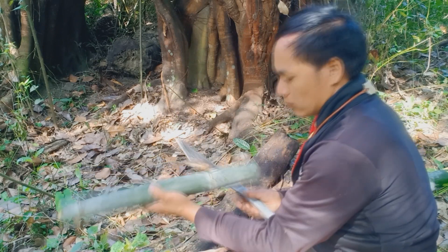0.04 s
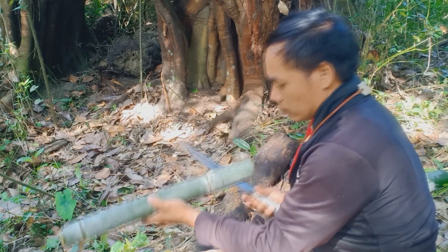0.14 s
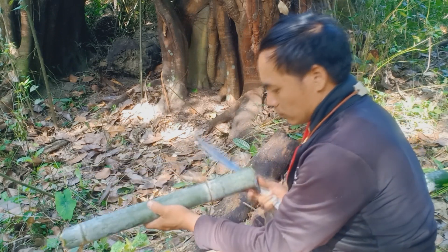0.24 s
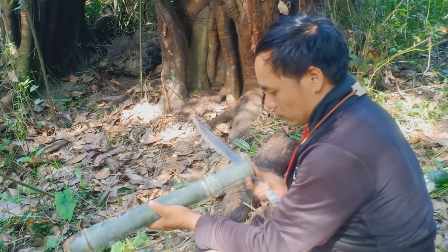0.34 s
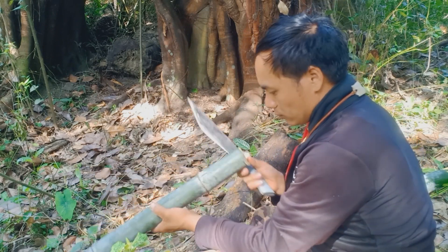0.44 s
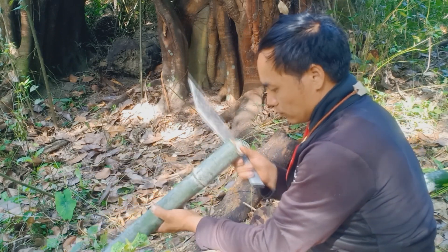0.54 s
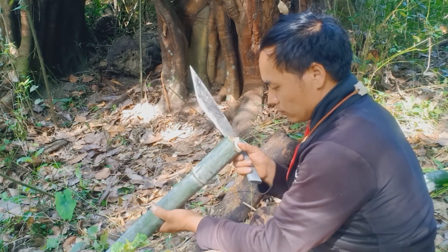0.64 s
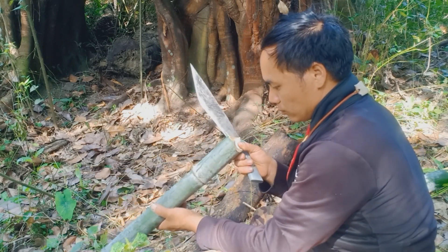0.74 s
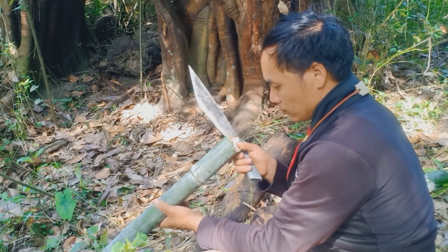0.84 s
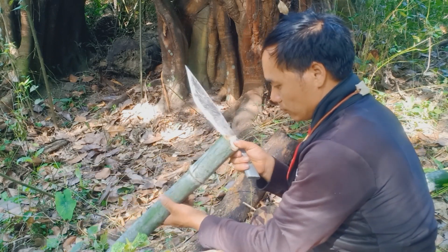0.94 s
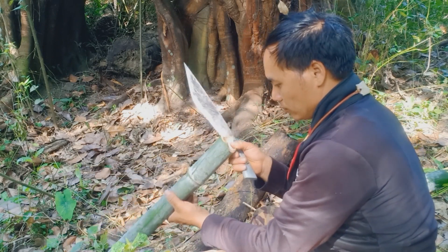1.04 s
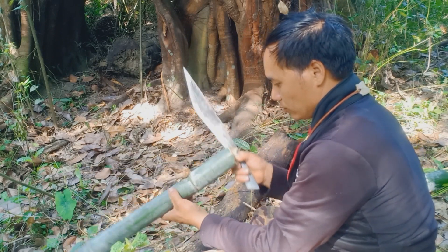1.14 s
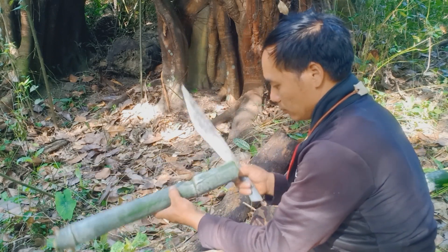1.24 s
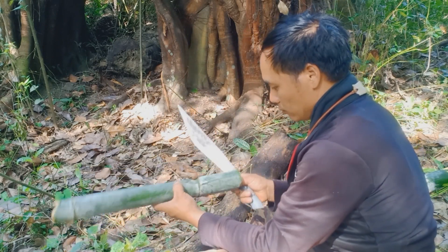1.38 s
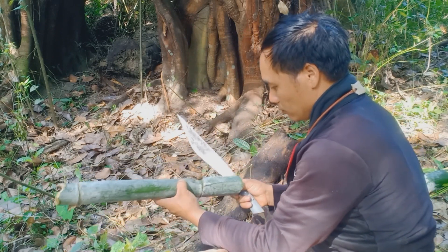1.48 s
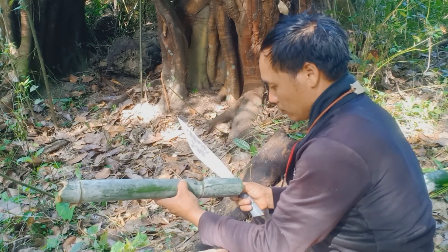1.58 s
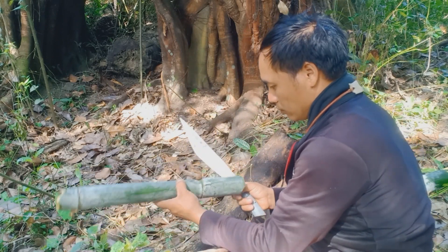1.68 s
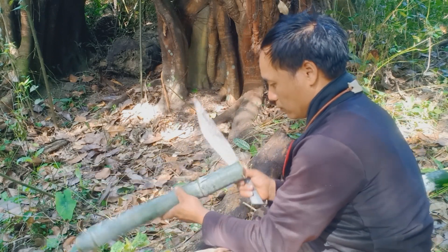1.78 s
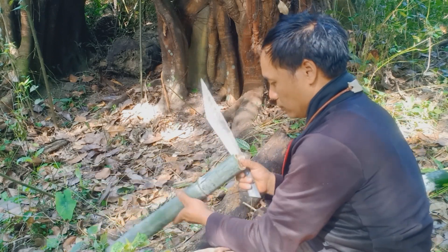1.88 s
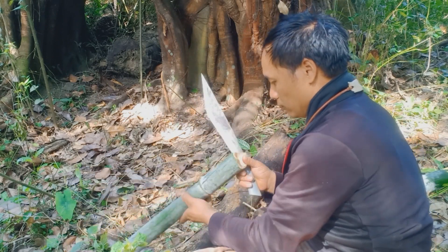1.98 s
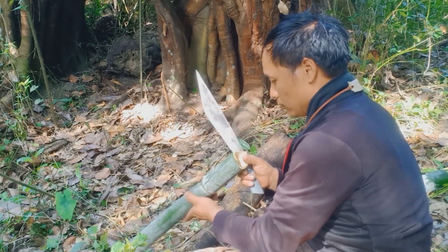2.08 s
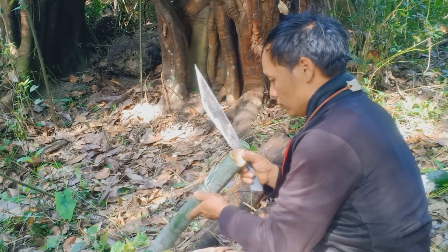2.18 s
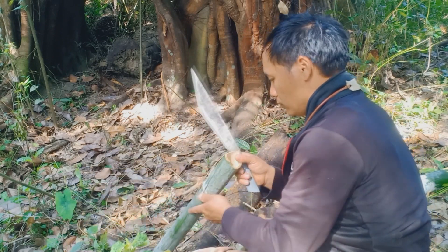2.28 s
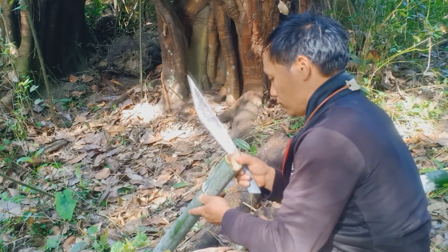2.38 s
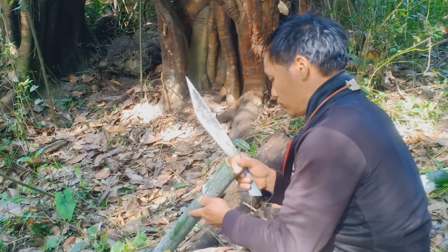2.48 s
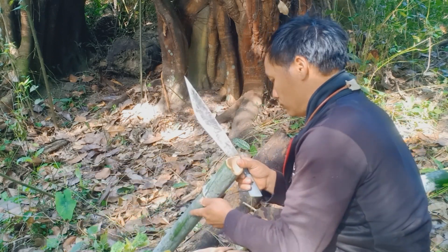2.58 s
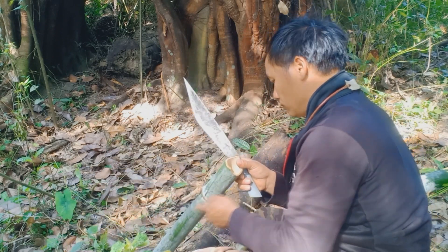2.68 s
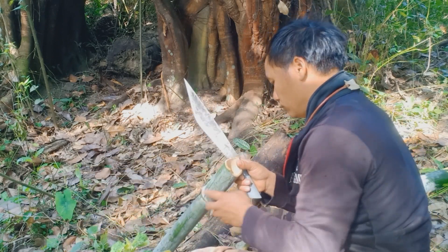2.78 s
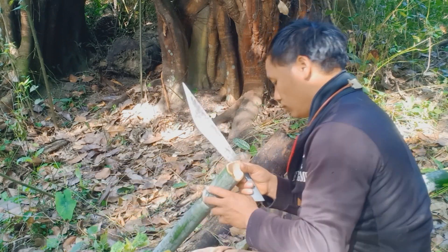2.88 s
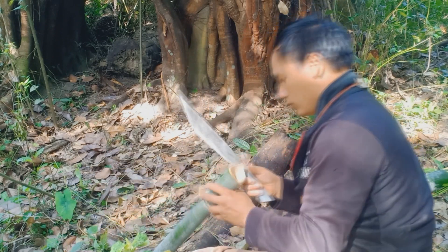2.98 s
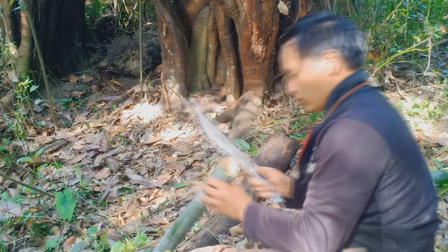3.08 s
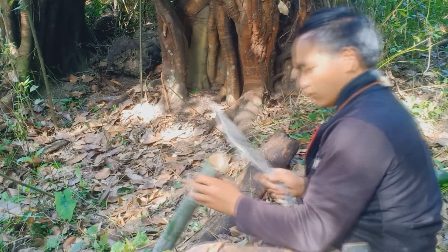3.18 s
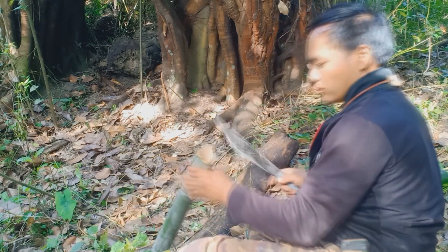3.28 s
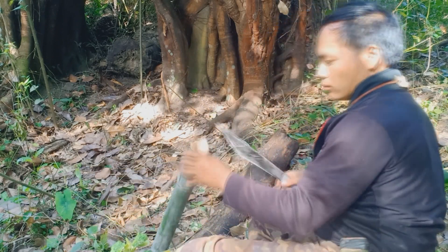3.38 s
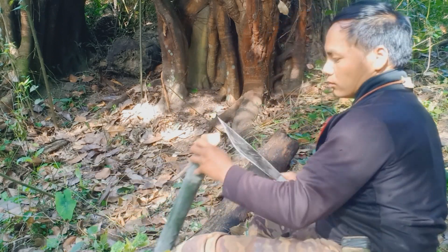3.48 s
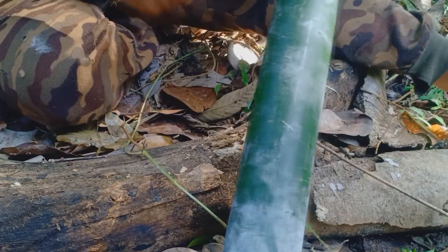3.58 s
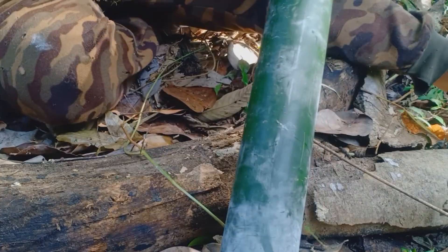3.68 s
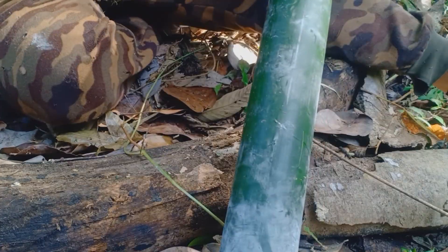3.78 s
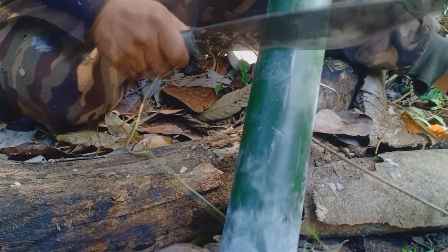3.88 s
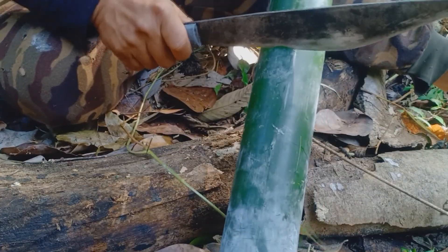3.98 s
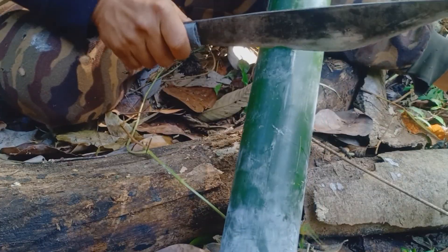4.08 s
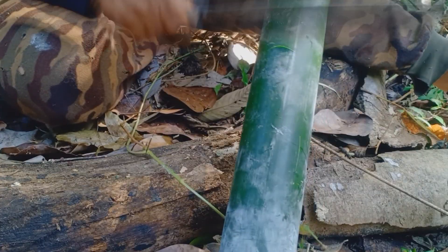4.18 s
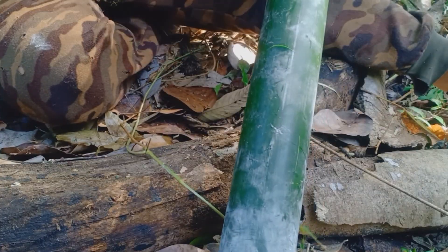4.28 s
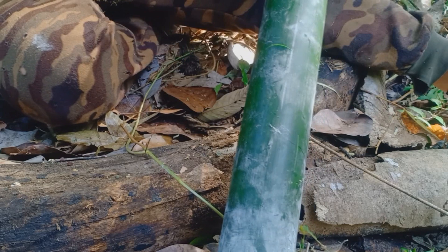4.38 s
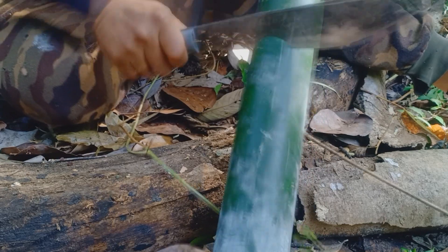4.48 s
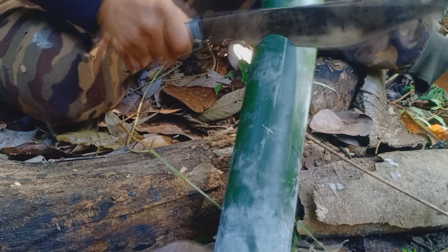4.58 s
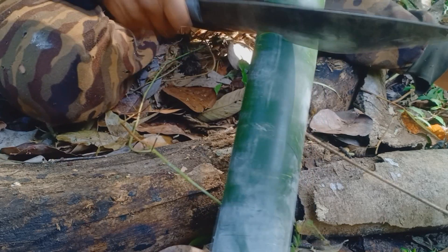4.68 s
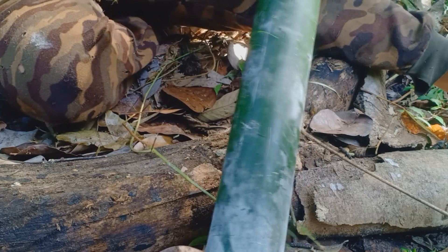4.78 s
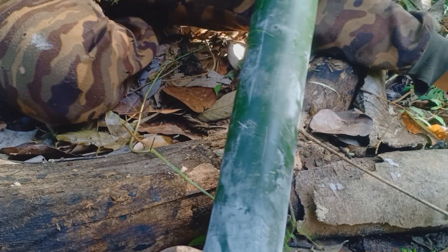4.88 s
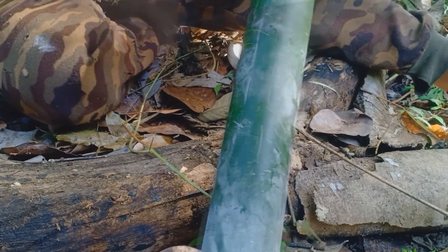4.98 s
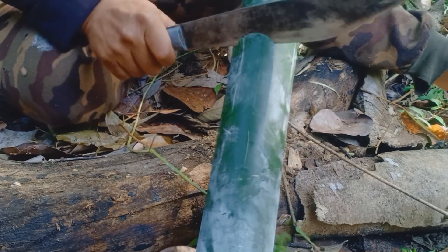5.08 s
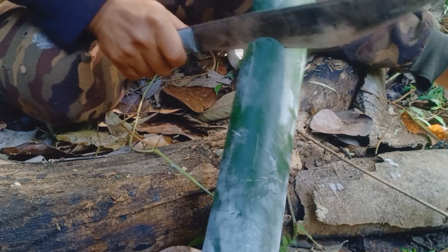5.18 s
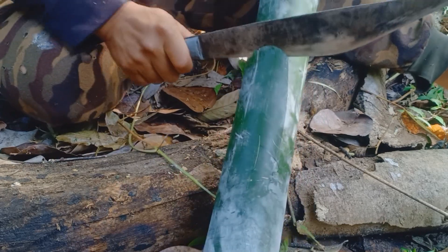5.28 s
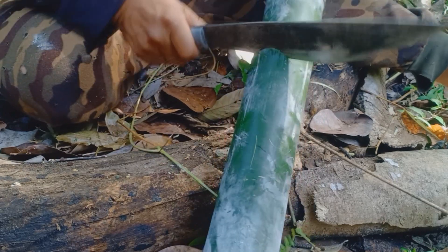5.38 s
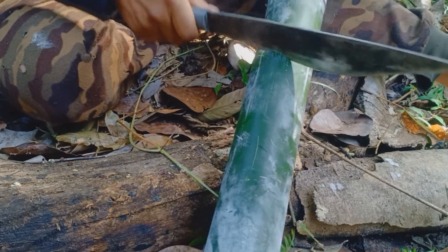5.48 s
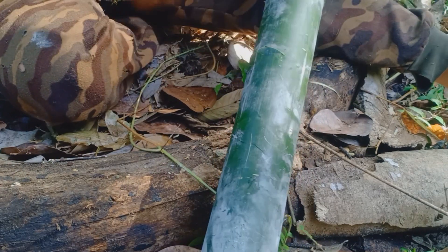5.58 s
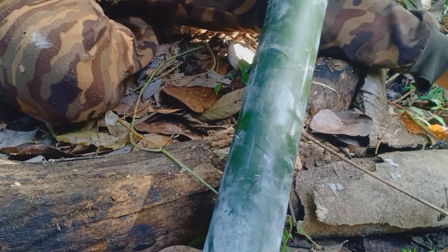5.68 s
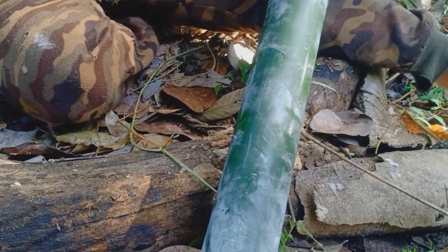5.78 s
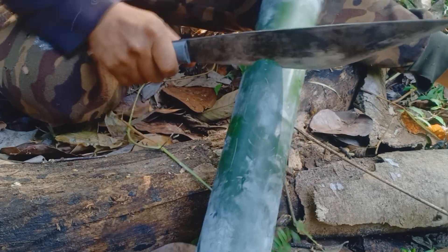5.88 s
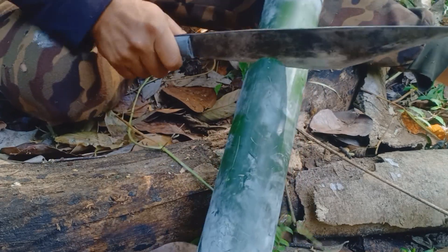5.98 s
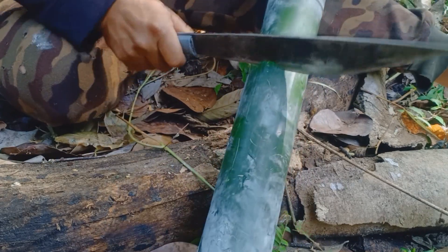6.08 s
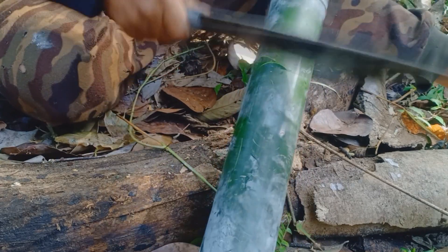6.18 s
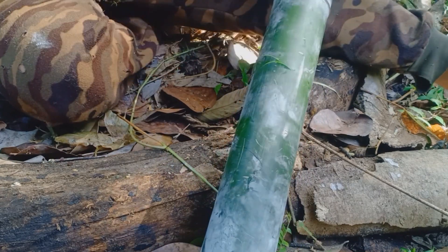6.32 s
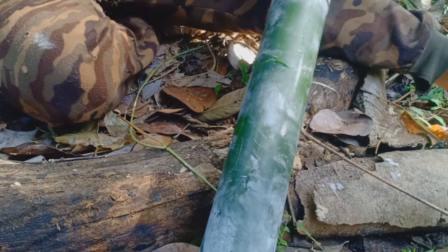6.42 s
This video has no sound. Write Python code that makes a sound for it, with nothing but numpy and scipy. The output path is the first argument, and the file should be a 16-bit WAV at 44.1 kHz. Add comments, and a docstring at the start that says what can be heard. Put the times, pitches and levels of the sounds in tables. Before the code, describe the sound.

Faint forest hush and distant whistling birds with rustling sleeves and leaves and a few small woody taps. After a louder clack, four hard machete chops land on a hollow bamboo pole, roughly half a second to nearly a second apart, each introduced by a bright tick. Gritty scraping and snapping fibres fill the gaps. Close, dry stereo pickup, with the background dipping around the loud blows and only a short leafy outdoor echo.

```python
"""Forest hush lies under it all. At first a green bamboo pole is handled quietly under distant birds, with
rustling sleeves and dry leaves: chirping sine glides and colored noise. Then a machete lands four blows, each
after a sharp tick: noise bursts ring the modes of the wall, and the hollow joint hums on as a slow-dying sine.
The blade scrapes and squeaks free in grainy and resonant noise, and one last tick ends the work.
A small stereo recorder with a look-ahead limiter stands close by."""
import sys
import numpy as np
from scipy import signal
from scipy.fft import rfft, irfft
from scipy.io import wavfile
from scipy.ndimage import uniform_filter1d, minimum_filter1d

SR = 44100
rng = np.random.default_rng(int(sys.argv[2]) if len(sys.argv) > 2 else 0)


def put_to_file(sound):
    """Save the sound as 16-bit audio at rate SR, in the file named by the first command-line argument."""
    columns = np.atleast_2d(sound).T  # one column per channel
    safe = np.clip(columns, -1, 1)
    whole_steps = np.round(safe * 32767)
    wavfile.write(sys.argv[1], SR, whole_steps.astype(np.int16))


def invert_db(level):
    """Linear amplitude ratio for a level in decibels (20 dB per decade), elementwise."""
    return 10 ** (np.asarray(level, dtype=float) / 20)


N = 284445

# stereo image of far sounds: (frequency [Hz], left-right likeness [-1..1], used from 0 up)
FAR_IMAGE = [(60, 0.93), (380, -0.054), (2380, -1), (15000, 0.052)]
# stereo image of near sounds: (frequency [Hz], left-right likeness [0..1])
NEAR_IMAGE = [(60, 0.99), (240, 0.98), (950, 0.86), (3770, 0.35), (15000, 0.17)]


def rms_one(x):
    """Scales a signal to an rms of 1."""
    return x / np.sqrt(np.mean(x ** 2) + 1e-20)


def at_hz(points, hz):
    """Reads a curve of (frequency, value) on a log frequency axis."""
    points = np.array(points)
    return np.interp(np.log(hz + 1), np.log(points[:, 0]), points[:, 1])


def add(out, x, s):
    """Mixes x into out from time s, cut at the end of the scene."""
    i = round(s * SR)
    out[:, i:i + x.shape[-1]] += x[..., :N - i]


def pair(mid, side, likeness, colour=((20, 0), (20000, 0))):
    """Left and right from two sources: the likeness curve sets how much they share at each frequency."""
    hz = np.fft.rfftfreq(len(mid), 1 / SR)
    alike = np.clip(at_hz(likeness, hz), 0, 1)
    shared = np.sqrt(1 + alike) * rfft(mid)
    opposed = np.sqrt(1 - alike) * rfft(side) * [[1], [-1]]
    return irfft((shared + opposed) * invert_db(at_hz(colour, hz)), len(mid))


def ring(x, hz, t60):
    """Two-pole resonance: a unit click sets a sine of about height 1 ringing."""
    r, w = invert_db(-60 / (t60 * SR)), 2 * np.pi * hz / SR
    return signal.lfilter([0, np.sin(w)], [1, -2 * r * np.cos(w), r * r], x)


def decaying(db, hz, t60, rise_s):
    """One mode that swells briefly and dies."""
    t = np.arange(int(t60 * SR)) / SR
    return invert_db(db - 60 * t / t60) * (1 - np.exp(-t / rise_s)) * np.sin(2 * np.pi * hz * t)


def grains(colour, likeness, per_s, spread_db, smooth):
    """Dense uneven clicks in clumps over a smooth bed; rms 1."""
    clumps = np.repeat(rng.standard_normal(N // 256 + 1), 256)[:N]
    clumps_db = 1.3 * uniform_filter1d(clumps, size=300)
    born = rng.random(N) < per_s / SR
    sizes = invert_db(spread_db * rng.exponential(1, N)) * invert_db(clumps_db)
    sizes = np.minimum(sizes, invert_db(14))
    white = rng.standard_normal((2, N)) * (rms_one(born * sizes) + smooth)
    return rms_one(pair(*white, likeness, colour))


def swells(rows):
    """Gain over time: each movement swells to its loudest moment and fades; powers add."""
    t = np.arange(N) / SR
    swell_db = 20  # gained in one swell time, lost in one fade time
    power = 0
    for s, db, swell, fade in rows:
        away = np.maximum((s - t) / swell, (t - s) / fade)
        power = power + invert_db(db - swell_db * away) ** 2
    return np.sqrt(power)


def forest_hush():
    """Steady wide noise shaped to the colour of the forest."""
    # colour of the hush: (frequency [Hz], level [dB per Hz])
    hush_colour = [(12, -29.5), (20, -18.5), (34, -33), (53, -20), (94, -17), (426, -19.5), (533, -17.5),
                   (1390, -26), (2170, -20.5), (3600, -31.5), (4900, -26.5), (7890, -42.5), (9600, -44.5),
                   (13800, -40.5), (16400, -56.5)]
    white = rng.standard_normal((2, N))
    return invert_db(-70) * rms_one(pair(*white, FAR_IMAGE, hush_colour))


def waver():
    """Slow random unsteadiness of a bird's pitch, rms 1."""
    return rms_one(uniform_filter1d(rng.standard_normal(N), size=260))


def whistling_birds():
    """Single whistles and sung phrases: gliding sines with wavering pitch, fluttering through leaves."""
    # single whistles: (time [s], length [s], start pitch [Hz], end pitch [Hz], level [dB])
    single_notes = [(0.204, 0.11, 6700, 5600, -77), (0.283, 0.084, 5600, 5520, -72),
                    (0.338, 0.069, 6000, 7200, -80), (2.06, 0.13, 2150, 2136, -77)]
    # song phrase: (time after the held note starts [s], length [s], start pitch [Hz], end pitch [Hz],
    # level [dB]); both times are stretched below
    phrase_notes = [(-.03, .035, 5400, 4960, -13.5), (0, 0.09, 5060, 4960, 0),
                    (0.061, 0.044, 4100, 4040, -10.5), (0.086, .07, 5700, 5900, -8),
                    (.13, .04, 5050, 4900, -3), (0.165, .08, 4600, 4603, -2.5)]
    # phrases sung: (time [s], level [dB], stretch of time [factor])
    phrase_starts = [(.39, -69.5, 0.77), (1.405, -67.5, 1.03), (3.334, -67, 0.9)]
    notes = list(single_notes)
    for s, db, stretch in phrase_starts:
        for after, length, from_hz, to_hz, note_db in phrase_notes:
            notes.append((s + after * stretch, length * stretch, from_hz, to_hz, db + note_db))
    out, wander = np.zeros((2, N)), waver()
    flutter_db = 3.65 * rms_one(uniform_filter1d(rng.standard_normal(N), size=120))
    flutter = invert_db(flutter_db)  # leaves in the path
    for s, length, from_hz, to_hz, db in notes:
        t = np.arange(int(length * SR)) / SR
        during = slice(round(s * SR), round(s * SR) + len(t))
        glide = from_hz + (to_hz - from_hz) * t / length
        hz = glide * (1 + 0.015 * wander[during])
        arch = np.sin(np.pi * t / length) ** 0.5
        tone = np.sin(2 * np.pi * np.cumsum(hz) / SR)
        add(out, invert_db(db) * arch * tone * flutter[during], s)
    return out


def chipping_bird():
    """Short chips that leap up to their note with a hoarse start."""
    # chips: (time [s], level [dB] ahead of the envelope)
    chip_times = [(0.1984, -60.5), (0.6204, -62.5), (1.0665, -63), (1.8093, -65), (2.1066, -64.5),
                  (2.4828, -61.5), (3.0525, -64)]
    from_hz, to_hz, chip_ms = 3800, 5050, 17.4
    out, wander = np.zeros((2, N)), waver()
    t = np.arange(2048) / SR * 1000 / chip_ms  # in chip lengths
    leap = to_hz - (to_hz - from_hz) * np.exp(-t / 0.1)
    envelope = (1 - np.exp(-t / 0.021)) * np.exp(-t ** 2)
    for s, db in chip_times:
        rasp = 1 + 0.073 * wander[round(s * SR)::8][:len(t)] * np.exp(-t / 0.9)
        add(out, invert_db(db) * envelope * np.sin(2 * np.pi * np.cumsum(leap * rasp) / SR), s)
    return out


def birds():
    """All birds, far off and slightly to the right."""
    return (whistling_birds() + chipping_bird()) * invert_db([[-1.2], [1.2]])


def trunks(x, db, t60):
    """Far returns from trunks: dying noise, own in each ear."""
    t = np.arange(int(t60 * SR)) / SR
    tail = rng.standard_normal((2, len(t))) * invert_db(-60 * t / t60) * (1 - np.exp(-t / 0.0018))
    tail = tail / np.sqrt(np.mean(np.sum(tail ** 2, axis=1)))
    return invert_db(db) * signal.fftconvolve(x, tail, axes=1)[:, :N]


def leaves(x):
    """Moving foliage returns each third-octave band as fresh noise that dies away."""
    # scatter from leaves and trunks: (frequency [Hz], gain [dB])
    scatter_gain = [(350, -24.5), (1000, -26.5), (1800, -25.5), (2500, -20.5), (3400, -25), (4800, -10),
                    (6500, -29.5), (9000, -28.5), (15000, -7.5)]
    # how long the scatter lasts: (frequency [Hz], time to fall 60 dB [s])
    scatter_decay = [(350, 0.17), (2500, 0.35), (15000, 0.29)]
    out, edges = 0, 300 * 2 ** np.arange(0, 5.9, 1 / 3)
    white = rng.standard_normal((2, 2, N))
    mono = x.mean(axis=0) + 1e-12
    for k, (low, high) in enumerate(zip(edges, edges[1:])):
        hz = np.sqrt(low * high)
        band = signal.butter(2, [low, high], "band", fs=SR, output="sos")
        keep = invert_db(-120 / (at_hz(scatter_decay, hz) * SR))  # 120: this decay acts on power
        power = signal.lfilter([0.001], [1, -keep], signal.sosfilt(band, mono) ** 2)
        noise = rms_one(signal.sosfilt(band, white[k % 2]))  # neighbouring bands differ
        out = out + invert_db(at_hz(scatter_gain, hz)) * np.sqrt(power) * noise
    return out


def rustle():
    """Sleeves and dry leaves: very dense grains that swell and fade with each movement."""
    # movements: (loudest time [s], level [dB], swell [s], fade [s])
    movements = [(.15, -78, .12, .1), (.95, -73, 0.13, 0.47), (1.12, -71, 0.35, 0.06),
                 (1.7, -91, 0.36, 0.58), (2.15, -79, 0.11, 0.51), (2.3, -66, 0.49, 0.088),
                 (2.72, -71.5, 0.24, 0.41), (2.96, -67, 0.065, 0.34), (3.4, -71, 0.38, 0.076),
                 (3.6, -71, 0.24, 0.037)]
    # colour of cloth and leaves: (frequency [Hz], level [dB])
    leaf_colour = [(150, -24), (400, -6), (1000, 6), (2300, 12), (5000, 18.5), (7500, 6), (11000, -5),
                   (14000, 7.5), (16000, -17)]
    return swells(movements) * grains(leaf_colour, FAR_IMAGE, per_s=5200, spread_db=4.5, smooth=0.6)


def scrape():
    """Blade and pole rub on fibres and leaves: coarser grains that swell and fade."""
    # rubs: (loudest time [s], level [dB], swell [s], fade [s])
    rubs = [(1.75, -69.5, 0.09, 0.093), (2.95, -64, 0.05, .05), (3.675, -60, 0.0096, 0.11),
            (3.81, -58.5, 0.08, 0.089), (4.12, -64.5, 0.17, 0.16), (4.28, -71.5, 0.018, 0.086),
            (4.725, -51.5, 0.22, 0.042), (4.764, -41.5, 0.071, 0.038), (4.81, -59.5, .05, 0.11),
            (5.245, -59, 0.59, 0.065), (5.37, -49.5, 0.087, 0.16), (5.425, -49, .05, 0.019),
            (5.5, -57.5, .06, 0.15), (5.553, -48, 0.022, 0.1), (5.77, -67, 0.17, .05),
            (5.83, -56, 0.063, 0.18), (6.0, -56.5, 0.054, 0.23), (6.21, -55, 0.35, .025),
            (6.288, -61.5, 0.18, 0.093), (6.41, -67.5, 0.082, 0.091)]
    # colour of the rubbing: (frequency [Hz], level [dB per Hz])
    rub_colour = [(180, -61.5), (300, -11), (412, -16), (565, -7), (762, -2), (915, -7), (1010, -7),
                  (1530, -11), (1930, -3), (2650, -5.5), (3760, -12), (5080, -7), (8790, -31),
                  (13500, -24.5), (16000, -32)]
    return swells(rubs) * grains(rub_colour, NEAR_IMAGE, per_s=740, spread_db=5.5, smooth=1.0)


def squeaks():
    """The blade drags with a hoarse squeak: stick-slip noise through one resonance."""
    # squeaks: (time [s], length [s], pitch [Hz], level [dB])
    drags = [(6.243, 0.095, 2340, -62), (6.26, 0.056, 5050, -59)]
    out = np.zeros((2, N))
    for s, length, hz, db in drags:
        count = int(length * SR)
        rub = pair(*rng.standard_normal((2, 8192)), NEAR_IMAGE)[:, :count]
        arch = np.sin(np.pi * np.arange(count) / count)
        add(out, invert_db(db) * rms_one(ring(rub, hz, t60=0.0124)) * arch, s)
    return out


def contact(db, ms, bass_db, treble_db, after_db, after_ms, cut_hz, rise_ms=0.24):
    """Fibres snap for some ms, splinters crackle on; both ring the wall modes."""
    # wall of the pole, damped by wet fibre: (frequency [Hz], level [dB], time to fall 60 dB [s])
    wall_modes = [(357.4, -15, 0.053), (774, -32.5, 0.022), (915, 1.5, 0.013), (1306, 0.5, 0.0083),
                  (1830, -4, 0.014), (2081, -6, 0.01), (2524, 8, 0.0058), (3050, 2.5, 0.0044),
                  (3860, 8, 0.0025), (4590, 4, 0.0082), (5120, -2.5, 0.0073), (5800, -40, 0.011),
                  (6700, -47, 0.015), (7810, -43.5, 0.0043), (10300, -66, 0.0087), (10600, -10, 0.0024),
                  (14000, -30, .002)]
    # contacts are duller above about 6 kHz: (frequency [Hz], level [dB])
    contact_colour = [(5800, 0), (8000, -6.5), (11000, -5.5), (16000, -3.5)]
    t = np.arange(8192) / SR * 1000
    bite, crackle = np.exp(-(t / ms) ** 2), invert_db(after_db) * np.exp(-t / after_ms)
    force = (1 - np.exp(-t / rise_ms)) * (bite + crackle)
    uneven = rng.standard_normal((2, 8192)) * (5.0 + rng.exponential(1, 8192))
    snaps = pair(*(force * uneven), NEAR_IMAGE, contact_colour)
    tilt, out = [(700, bass_db), (2000, 0), (5000, treble_db)], 0
    chances_db = rng.normal(0, 1.5, len(wall_modes))  # no two contacts ring alike
    for (hz, mode_db, t60), chance_db in zip(wall_modes, chances_db):
        out = out + invert_db(mode_db + at_hz(tilt, hz) + chance_db) * ring(snaps, hz, t60)
    out = signal.sosfilt(signal.butter(3, cut_hz, "high", fs=SR, output="sos"), out)
    loudest = uniform_filter1d(np.mean(out ** 2, axis=0), size=180).max()
    return invert_db(db) * out / np.sqrt(8 * loudest)  # loudest 4 ms: rms 9 dB below db


def handling(hits, hums):
    """Pole and blade knock together; the short piece, the long pole and the ground answer in sines."""
    # knocks: (time [s], level [dB], bass tilt [dB], treble tilt [dB])
    knocks = [(0.143, -54.5, -12, 5), (0.156, -58, -10, 12), (1.261, -42.5, -21, -18), (1.649, -55, 7, -9),
              (1.909, -53.5, -6, -18), (2.301, -44, -24, 2), (2.927, -55, -18, -23), (2.969, -51, -21, 1),
              (3.644, -45, -28, -7), (3.668, -36, -22, -11), (4.179, -51.5, -4, -19),
              (4.726, -33.5, -24, -7), (4.745, -32.5, -33, -25.5), (4.758, -29.5, -23, 25),
              (4.908, -50.5, 8, -28), (5.31, -47, 12, -30), (5.363, -40.5, -36, -10),
              (5.427, -40.5, -7, 1.5), (5.492, -43, -24, -34), (5.551, -38.5, -32, -14.5),
              (5.566, -41, 2, -13), (5.76, -45, -3, 0), (6.116, -44, 3, -17), (6.206, -42.5, -31, -10.5)]
    # the short piece hums when knocked: (time [s], level [dB])
    short_hums = [(1.272, -57), (1.652, -64), (1.91, -70.5), (2.935, -65)]
    # the long pole answers some knocks with a brief hollow note: (time [s], level [dB])
    pole_notes = [(3.668, -44), (3.792, -55), (4.18, -56), (5.427, -50), (6.118, -60)]
    # pole end meets the ground: (time [s], level [dB])
    set_downs = [(2.303, -48.5)]
    for s, db, bass_db, treble_db in knocks:
        add(hits, contact(db, 3.5, bass_db, treble_db, after_db=-3, after_ms=16.5, cut_hz=240), s)
    for s, db in short_hums:
        add(hums, decaying(db, hz=589.5, t60=0.21, rise_s=0.00087), s)
    for s, db in pole_notes:
        add(hums, decaying(db, hz=819, t60=0.072, rise_s=0.0012), s)
    for s, db in set_downs:
        add(hums, decaying(db, hz=195, t60=0.039, rise_s=0.0019), s)


def fibre_snaps(hits):
    """Single fibres and twigs snap: very short contacts with little bass."""
    # snaps: (time [s], level [dB], treble tilt [dB])
    snap_times = [(0.969, -54.5, -16), (3.272, -47, 29), (4.275, -44, 25), (4.678, -47.5, 5),
                  (4.785, -41, -20), (4.812, -38, -2), (5.24, -39.5, -3.5), (5.638, -38, 2),
                  (5.723, -54, -13), (6.074, -42, -4.5)]
    for s, db, treble_db in snap_times:
        add(hits, contact(db, 0.74, -20, treble_db, after_db=-13.5, after_ms=4.0, cut_hz=630), s)


def ticks(hits):
    """Sharp tick ahead of each blow, and one after the last: a contact stripped of its bass."""
    # ticks: (time [s], level [dB], contact [ms], treble tilt [dB])
    tick_times = [(3.791, -16.5, 3.5, 8.5), (4.387, -25, 2.5, 7), (4.921, -23.5, 4.6, 6),
                  (5.79, -20, 2.8, -7), (6.418, -22, 2.17, 1.5)]
    for s, db, ms, treble_db in tick_times:
        add(hits, contact(db, ms, 0, treble_db, after_db=-9, after_ms=9.9, cut_hz=2140), s)


def blows(hits, hums):
    """The blade bites, the pole rebounds; the hollow joint, a low thump and the oval tube wall ring."""
    # blows: (time [s], level [dB], bite [ms], pole rebound [dB], thump [dB], oval ring [dB])
    blade_blows = [(3.8949, 1, 1.8, -2.5, -37, -4.5), (4.4889, 8.5, 2.06, -3.5, -6.5, -28.5),
                   (5.0278, 5, 3.5, -9, -18, -50), (5.882, 6, 4.67, -1, -14, -25)]
    for s, db, ms, rebound_db, thump_db, oval_db in blade_blows:
        bite = contact(db, ms, -8, -5, after_db=-13.5, after_ms=9.6, cut_hz=250, rise_ms=0.83)
        rebound = contact(rebound_db, 8.5, 3, -53.5, after_db=1.0, after_ms=3.6, cut_hz=360)
        thump = decaying(thump_db, hz=99, t60=0.038, rise_s=0.002)
        add(hits, bite, s)
        add(hits, rebound, s + 0.0028)
        add(hums, decaying(-28.5, hz=250.4, t60=0.61, rise_s=0.0039), s)  # hollow joint
        add(hums, thump * invert_db([[1.5], [-1.5]]), s)  # leans left
        add(hums, decaying(oval_db, hz=393.5, t60=0.036, rise_s=0.0028), s)


def bamboo():
    """Returns the dry contacts and the low hums of the hollow pole."""
    hits, hums = np.zeros((2, 2, N))
    handling(hits, hums)
    fibre_snaps(hits)
    ticks(hits)
    blows(hits, hums)
    return hits, signal.sosfilt(signal.butter(2, 55, "high", fs=SR, output="sos"), hums)


def scene():
    """Forest hush, birds, rustle, blade and pole."""
    song = birds()
    hits, hums = bamboo()
    background = forest_hush() + song + trunks(song, db=1.5, t60=1.0) + rustle()
    return background + scrape() + squeaks() + leaves(hits) + hums + hits


def top_cut(x):
    """Nothing passes above the cut-off."""
    return signal.sosfilt(signal.butter(12, 16520, fs=SR, output="sos"), x)


def record(dry):
    """The limiter ducks just ahead of loud sounds and lets go steadily; peaks are rounded."""
    limit_db, squeeze, look_ahead_s, release_db_s = -22, 0.34, 0.025, 137.5
    top = 0.6  # peaks are rounded below this height
    level_db = 20 * np.log10(np.abs(dry).max(axis=0) + 1e-9)
    duck_db = np.maximum(level_db - limit_db, 0) * squeeze
    ahead, slope = int(look_ahead_s * SR), release_db_s * np.arange(N) / SR
    duck_db = -minimum_filter1d(-duck_db, size=2 * ahead + 1)  # holds the deepest duck nearby
    duck_db = np.maximum.accumulate(duck_db + slope) - slope
    duck_db = uniform_filter1d(duck_db, size=ahead // 2 + 1)
    ducked = (dry + 0.00045) * invert_db(-duck_db)  # the converter's small offset ducks along
    mix = top * np.tanh(ducked / top)
    return top_cut(mix)


dry = scene()
out = record(dry)
put_to_file(out)
```